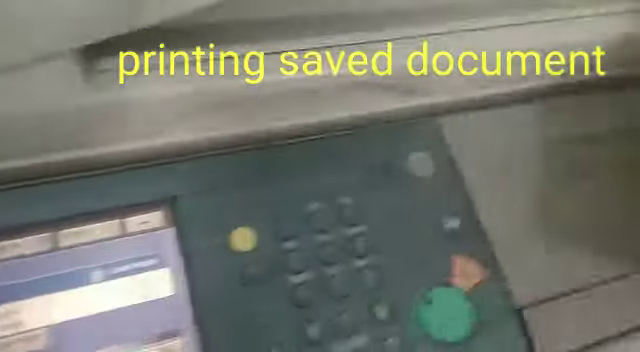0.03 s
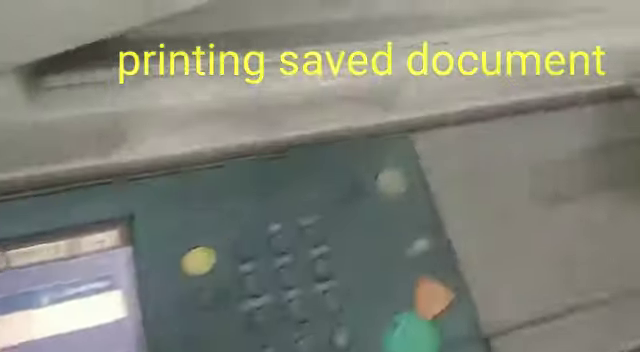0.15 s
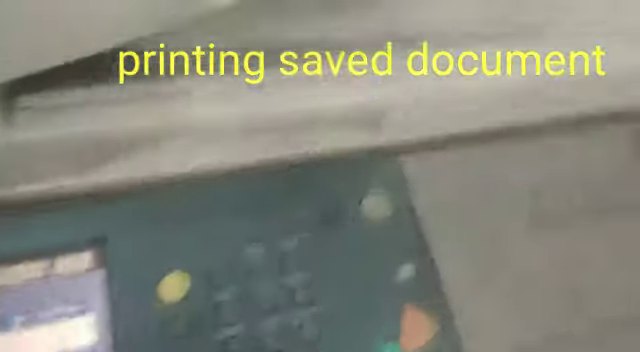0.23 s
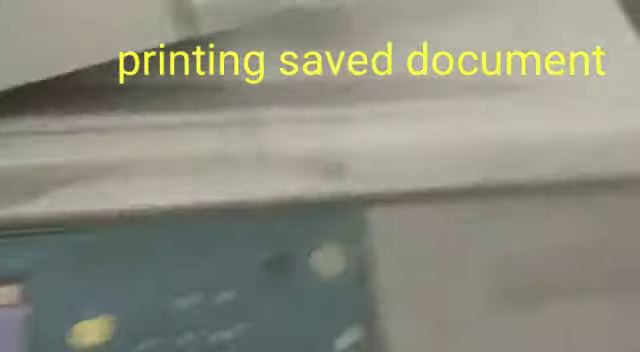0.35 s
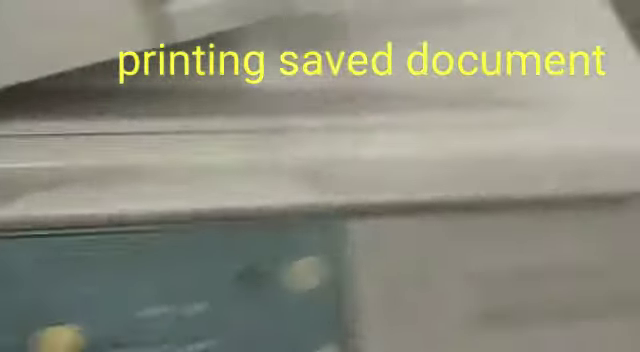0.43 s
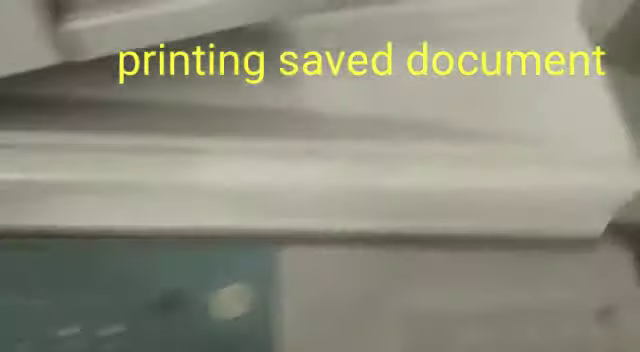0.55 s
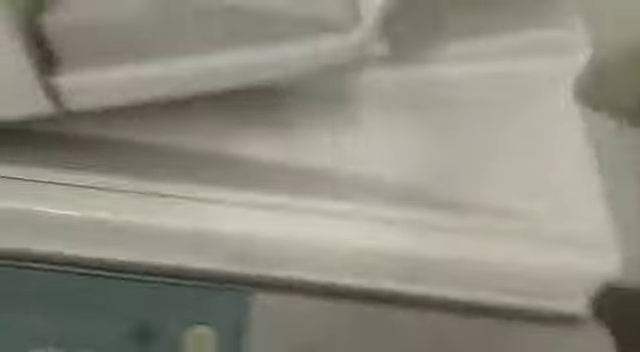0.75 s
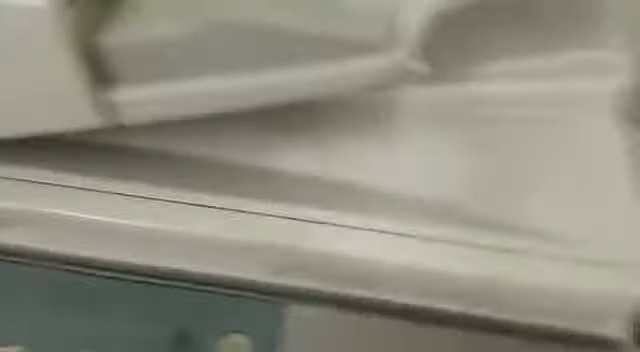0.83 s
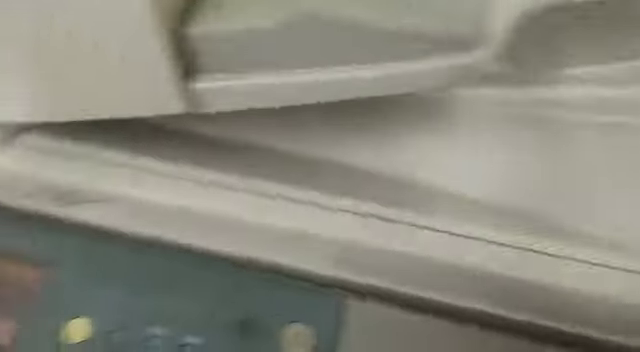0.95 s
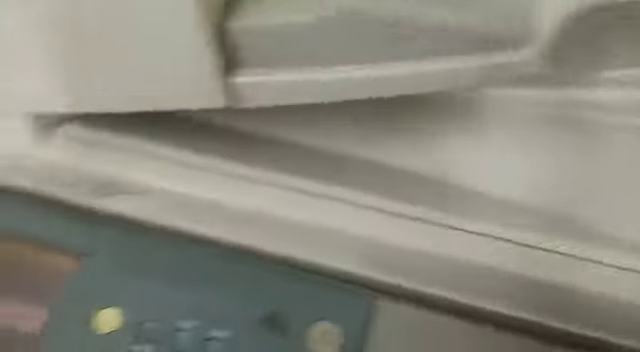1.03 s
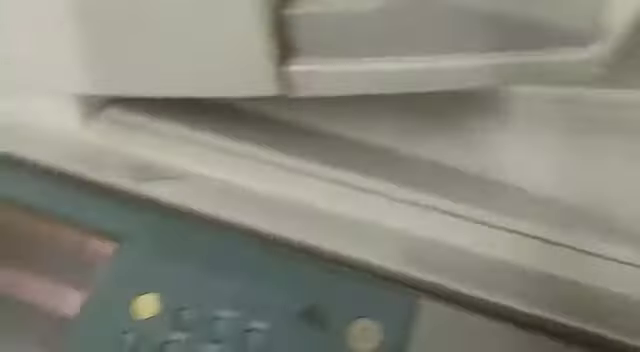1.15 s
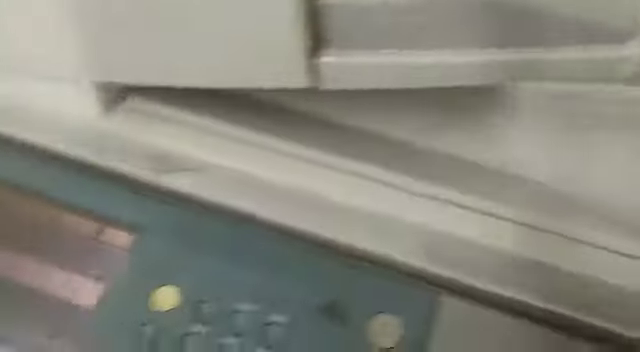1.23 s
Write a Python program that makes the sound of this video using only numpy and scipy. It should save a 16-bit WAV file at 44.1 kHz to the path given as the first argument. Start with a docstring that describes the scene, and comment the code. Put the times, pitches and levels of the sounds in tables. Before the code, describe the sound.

An office copier clunks, then swishes a sheet through over a low motor hum.

```python
"""First comes a swish of paper with a thin whine, over a motor's hum and a low room rumble.
It is an office copier feeding a sheet, heard close up in a small room. The loudest sound is the clutch:
it clunks in a quick run of blows that make the plastic cabinet ring. Then a latch clicks and the sheet
slides through, scraping its guide. Rollers bump softly, and gear teeth knock together in short rattles."""
import sys
import numpy as np
from scipy import signal
from scipy.fft import rfft, irfft
from scipy.io import wavfile
from scipy.ndimage import uniform_filter1d

SR = 44100
rng = np.random.default_rng(int(sys.argv[2]) if len(sys.argv) > 2 else 0)


def bounce(signal):
    """Save signal as a 16-bit WAV file at the path given by the first command-line argument."""
    frames = np.transpose(np.atleast_2d(signal))
    limited = np.clip(frames, -1, 1)
    pcm = np.round(limited * 32767).astype(np.int16)
    wavfile.write(sys.argv[1], SR, pcm)


N = 57330

# motor and fan tones (pitch [Hz], level [dB], width [Hz], left minus right [dB])
MOTOR_TONES = [(66.2, -69, 12, 6), (526.4, -63, 13.5, -21.5), (765.6, -66, 18, -0.5), (873, -68, 26, -4),
               (1124, -90, 8.3, 5), (2180, -79.5, 16, 6), (2577, -77, 58, -1.5), (6380, -93, 46, -4),
               (13700, -90, 120, 3)]
# fan air and room rumble; a colour says how strong each frequency is (frequency [Hz], relative level [dB])
AIR_COLOUR = [(15, -19), (30, -3.5), (60, -1.5), (100, -3.5), (160, -9), (270, -2), (400, -9.5), (750, -9),
              (1100, -9.5), (1800, -11.5), (2400, -24), (3000, -16.5), (3700, -44.5), (7000, -47),
              (13000, -59), (16000, -66)]
# whines of the drive that feeds the paper (pitch [Hz], level [dB], width [Hz], start of fade [s])
DRIVE_WHINES = [(975, -60, 25, .085), (3950, -70, 100, .19), (4620, -76, 150, .18)]

# bursts of the gears (peak time [s], level [dB], rise [s], fall [s])
GEAR_BURSTS = [(0.041, -55, 0.035, 0.1), (0.976, -57, 0.17, 0.057), (1.245, -50.5, 0.032, 0.39),
               (1.284, -45, 0.054, 0.34)]
# colour of the gears in their housing (frequency [Hz], relative level [dB])
GEAR_COLOUR = [(60, -10), (130, -13), (290, -4.5), (450, -9), (620, -12.5), (760, 7.5), (1000, -9),
               (1450, -4.5), (2100, -28), (2900, -20.5), (3800, -47), (6000, -76)]
TOOTH_HZ, TOOTH_DECAY_S = 148, 0.0037

# roller bumps (time [s], pitch [Hz], level [dB], time to fade by 60 dB [s])
ROLLER_BUMPS = [(.03, 296, -51.5, 0.18), (.10, 299.5, -56, 0.58), (0.142, 254, -57, 0.35),
                (0.195, 244.6, -39.5, 0.19), (.428, 758, -48, 0.45), (.453, 260, -46.5, 0.12),
                (.655, 70, -47, 0.21), (.935, 240, -51, 0.18), (0.964, 203, -52, 0.19),
                (0.962, 122, -51.5, .15), (0.954, 70, -51.5, 0.34), (1.035, 71, -37, 0.046),
                (1.234, 652, -41, 0.12)]
BUMP_RISE_S, BUMP_THUD_DB = 0.0047, -4

# swishes of the sheet (peak time [s], level [dB], rise [s], fall [s])
PAPER_SWISHES = [(.005, -50.5, 0.14, 0.12), (.07, -60.5, .06, .06), (0.192, -65.5, 0.0072, 0.11),
                 (.735, -63.5, 0.16, 0.096), (.8, -48.5, 0.18, 0.17), (.9, -57, 0.15, 0.065),
                 (1.07, -72, 0.057, .16), (1.24, -66, 0.02, 0.03), (1.287, -59.5, 0.065, 0.12)]
# colour of sliding paper (frequency [Hz], relative level [dB])
PAPER_COLOUR = [(2000, -62), (4200, -24), (6000, -18), (8000, -7), (10000, -0.5), (12500, -6.5),
                (15000, -11.5), (17000, -28)]
# the sheet's scrape along its guide (peak time [s], level [dB], rise [s], fall [s])
GUIDE_SCRAPE = (.808, -57, .15, .13)
# colour of that scrape (frequency [Hz], relative level [dB])
SCRAPE_COLOUR = [(1700, -35), (2300, -4), (3200, 0), (3700, -17), (4300, -15), (5000, -6), (6500, -7),
                 (10000, -35)]

# colour of the latch's click (frequency [Hz], relative level [dB])
LATCH_COLOUR = [(200, -32), (450, -7), (650, -9), (760, 10), (950, -4), (1350, -1.5), (1750, -6), (2200, 2),
                (3200, -7.5), (4000, -18.5), (7000, -20.5), (11500, -15), (14000, -18), (16000, -50)]
LATCH_TIME_S, LATCH_DB, LATCH_RISE_S, LATCH_FADE_S = 0.6136, -46.5, 0.0054, 0.46

# blows of the clutch (time [s], relative ring level [dB], relative crack level [dB])
CLUTCH_BLOWS = [(0.213, -28, -9), (0.224, 0.95, -8.5), (0.2321, 0.5, 2.5), (0.2386, -0.9, 3),
                (0.2463, -1, -3), (0.2579, -1.5, -5), (0.2723, -5.5, -5), (0.2943, -9.5, -4),
                (0.3396, -17.5, -10), (0.3671, -18.5, -34)]
# notes the cabinet rings at
# (pitch [Hz], relative level [dB], time to fade by 60 dB [s], left minus right [dB])
CABINET_NOTES = [(116, -35, 0.12, 10), (228, -7.5, .1, 3), (410.4, -18, 0.22, -8), (532.8, -8, 0.3, 3),
                 (630, -6, 0.073, 3), (722.8, 2.5, .14, 5.5), (758.7, -6, 0.2, 1), (823, -24, 0.4, 13),
                 (866.6, 2, 0.06, 4.5), (1104, -38, 0.22, 10), (1266, -17.5, 0.42, 19), (1433, -14, 0.5, 8)]
# colour of the crack of each blow (frequency [Hz], relative level [dB])
CRACK_COLOUR = [(60, -36), (120, -0.5), (160, -3.5), (240, -1), (340, -3), (700, 1.5), (1000, -1),
                (1350, 3), (1900, -6.5), (2300, -3.5), (2700, -9.5), (3200, -7), (4200, -14.5),
                (7000, -19.5), (11500, -16), (13500, -18.5), (15000, -37)]
CONTACT_S, RING_DB, CRACK_DB, CRACK_FADE_S = 0.001, -30, -38.5, 0.32


def undb(db):
    """Turn decibels into a gain, the number to multiply a sound by."""
    return 10 ** (np.asarray(db) / 20)


def unit(x):
    """Scale a signal so that its average strength (rms) is 1."""
    return x / np.sqrt(np.mean(x ** 2))


def pan(db):
    """Left and right gains that make the left side db decibels louder."""
    return unit(undb(np.array([[db], [-db]]) / 2))


def since(start):
    """Seconds since a moment, zero before it."""
    return np.maximum(np.arange(N) / SR - start, 0)


def fade(start, fade_s):
    """Start suddenly, then die away by 60 dB every fade_s seconds."""
    return (since(start) > 0) * np.exp(-np.log(1000) * since(start) / fade_s)


def swell(peak, db, rise, fall):
    """Climb to a peak and die away; rise and fall are the seconds for a change of 20 dB."""
    t = np.arange(N) / SR - peak
    return undb(db - 20 * np.maximum(-t / rise, t / fall))


def wander(rate_hz):
    """A smooth random drift, about 1 in size."""
    step = int(SR / rate_hz)
    held = rng.standard_normal(N)[np.arange(N) // step]
    return unit(uniform_filter1d(uniform_filter1d(held, step), step))


def colour(points):
    """Join (frequency [Hz], level [dB]) points into a gain for every frequency."""
    hz, db = np.array(points).T
    return lambda f: undb(np.interp(np.log(f + 1), np.log(hz), db))


def noise(gain, alike_below_hz=790):
    """Stereo noise shaped by a gain for each frequency; the bass is alike in both ears."""
    f = np.arange(N // 2 + 1) * SR / N
    alike = 1 / (1 + (f / alike_below_hz) ** 2)
    mid, side = rfft(rng.standard_normal((2, N))) * gain(f) * np.sqrt([1 + alike, 1 - alike])
    return unit(irfft([mid + side, mid - side], N))


def narrow(hz, width):
    """Noise gathered around one pitch; a small width sounds like a wavering tone."""
    return noise(lambda f: 1 / (1 + ((f - hz) / width) ** 2) ** 2)


def room(sound, echo_db=-16, fade_s=0.35):
    """Add the short, blurred echo of the office."""
    tail = noise(np.ones_like) * fade(0.0014, fade_s)
    tail = unit(tail) / np.sqrt(N)
    return sound + undb(echo_db) * signal.fftconvolve(sound, tail, axes=1)[:, :N]


def motor(air_db=-60.5):
    """The motor and fan hum with wavering tones over moving air and room rumble."""
    tones = sum(undb(db) * pan(pan_db) * narrow(hz, width) for hz, db, width, pan_db in MOTOR_TONES)
    air = undb(air_db) * pan(db=0.5) * noise(colour(AIR_COLOUR))
    return tones + air


def feed_drive(fall_s=0.15):
    """The drive whines thinly at first, then each whine drops by 20 dB every fall_s seconds."""
    return sum(undb(db - 20 * since(stop) / fall_s) * narrow(hz, width)
               for hz, db, width, stop in DRIVE_WHINES)


def gears():
    """The gears run in short bursts; their teeth knock unevenly and the housing colours the sound."""
    teeth_passed = np.cumsum(TOOTH_HZ * (1 + 0.2 * wander(rate_hz=52))) / SR
    knock_age = (teeth_passed % 1) / TOOTH_HZ
    rattle = (0.5 + np.exp(-knock_age / TOOTH_DECAY_S)) * noise(np.ones_like)
    f = np.arange(N // 2 + 1) * SR / N
    housed = irfft(rfft(rattle) * colour(GEAR_COLOUR)(f), N)
    bursts = np.sqrt(sum(swell(*burst) ** 2 for burst in GEAR_BURSTS))
    return pan(db=5) * bursts * unit(housed)


def rollers():
    """Each soft push of a roller makes a short, low ring with a dull thud around it."""
    bumps = 0
    for start, hz, db, fade_s in ROLLER_BUMPS:
        age = since(start)
        onset = 1 - np.exp(-age / BUMP_RISE_S)
        ring = np.sin(2 * np.pi * hz * age)
        thud = undb(BUMP_THUD_DB) * narrow(hz, hz / 2)
        bumps = bumps + undb(db) * onset * fade(start, fade_s) * (ring + thud)
    return bumps


def paper(grain_db=0.6):
    """The sheet hisses as it slides in surges, and scrapes its guide during the strongest one."""
    surges = np.sqrt(sum(swell(*swish) ** 2 for swish in PAPER_SWISHES))
    hiss = pan(db=8) * surges * noise(colour(PAPER_COLOUR))
    scrape = pan(db=1) * swell(*GUIDE_SCRAPE) * noise(colour(SCRAPE_COLOUR))
    grain = undb(grain_db * wander(rate_hz=500))  # a fast, slight flicker in level
    return grain * (hiss + scrape)


def latch():
    """A latch makes a light, bright click deep inside, blurred by the housing."""
    onset = 1 - np.exp(-since(LATCH_TIME_S) / LATCH_RISE_S)
    click = onset * fade(LATCH_TIME_S, LATCH_FADE_S) * noise(colour(LATCH_COLOUR))
    return undb(LATCH_DB) * pan(db=1.5) * click


def clutch():
    """Each blow makes the cabinet ring and sets off a crack from many small parts."""
    ring, crack_power = 0, 0
    for start, ring_db, crack_db in CLUTCH_BLOWS:
        age = since(start)
        push = undb(ring_db) * (1 - np.exp(-age / CONTACT_S))
        for k, (hz, db, fade_s, pan_db) in enumerate(CABINET_NOTES):
            direction = (-1) ** k  # neighbouring notes start by swinging opposite ways
            note = push * fade(start, fade_s) * np.sin(2 * np.pi * hz * age)
            ring = ring + direction * undb(db) * pan(pan_db) * note
        crack_power = crack_power + (undb(crack_db) * fade(start, CRACK_FADE_S)) ** 2
    crack = pan(db=4) * np.sqrt(crack_power) * noise(colour(CRACK_COLOUR))
    return room(undb(RING_DB) * ring) + undb(CRACK_DB) * crack


def scene(left_delay_s=0.00032):
    """All parts of the copier together; the sound reaches the left side slightly later."""
    left, right = clutch() + latch() + paper() + rollers() + gears() + motor() + feed_drive()
    late_left = np.pad(left, (int(left_delay_s * SR), 0))[:N]
    return np.array([late_left, right])


def record(dry):
    """Cut away the very highest treble."""
    top_hz = 15800
    low_pass = signal.ellip(10, 0.2, 70, top_hz, fs=SR, output="sos")
    return signal.sosfilt(low_pass, dry)


dry = scene()
out = record(dry)
bounce(out)
```